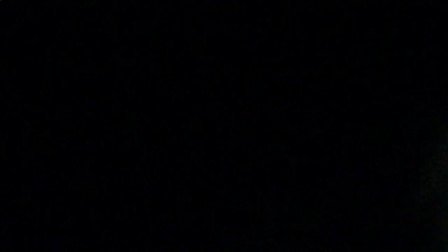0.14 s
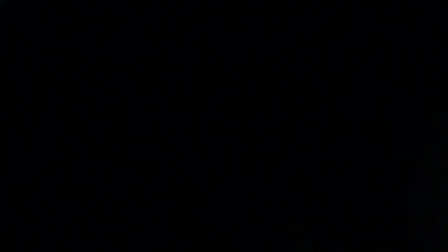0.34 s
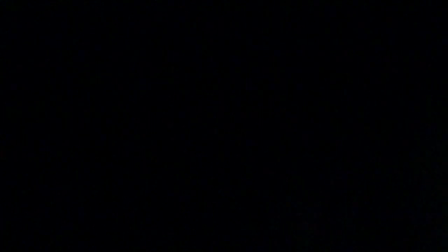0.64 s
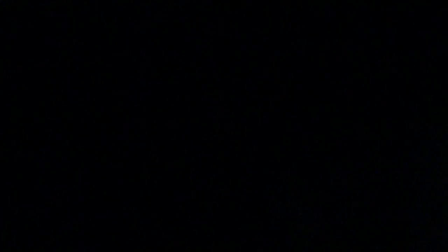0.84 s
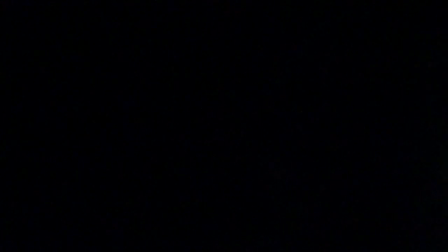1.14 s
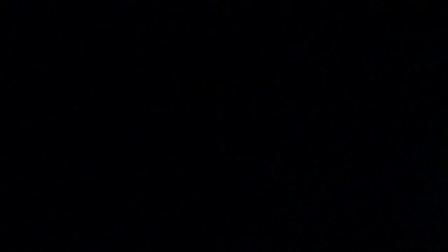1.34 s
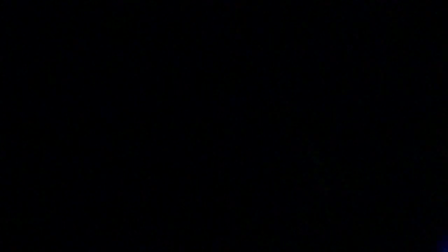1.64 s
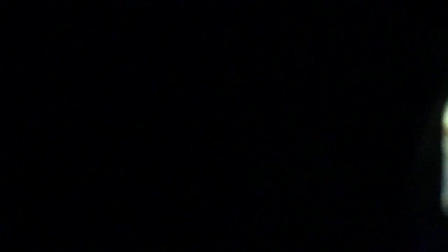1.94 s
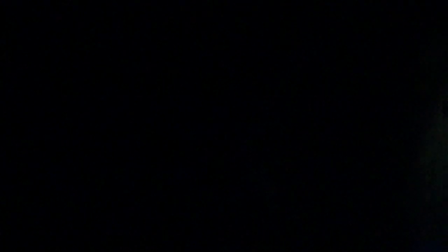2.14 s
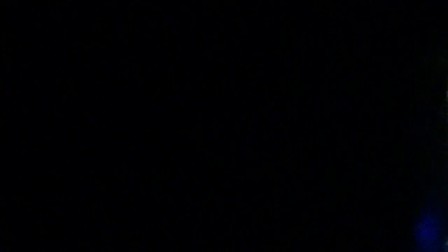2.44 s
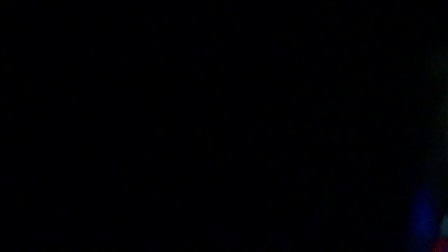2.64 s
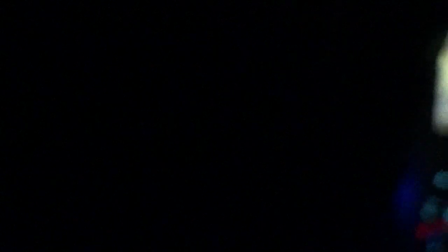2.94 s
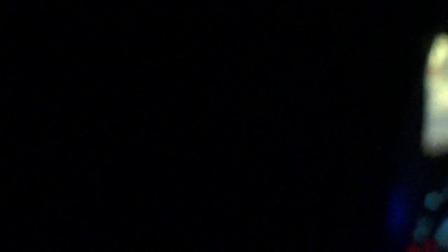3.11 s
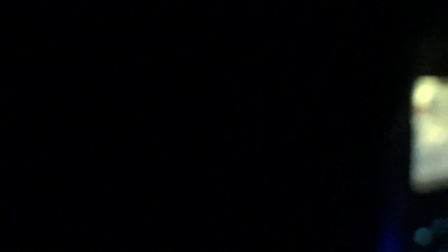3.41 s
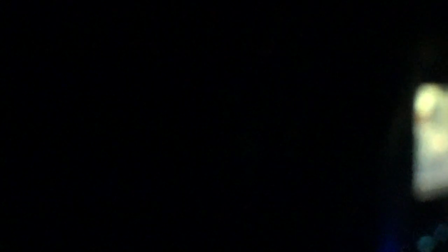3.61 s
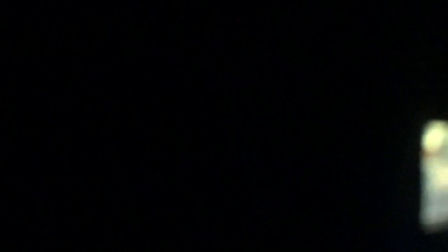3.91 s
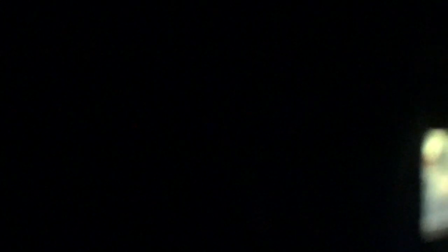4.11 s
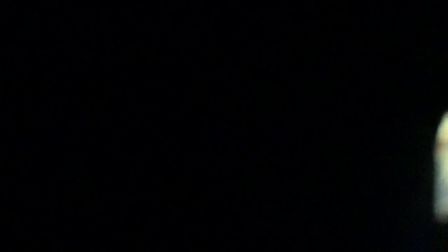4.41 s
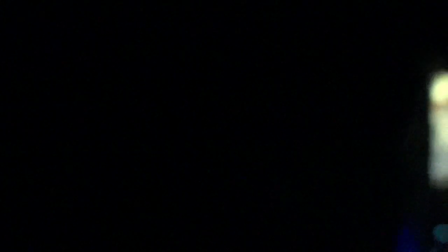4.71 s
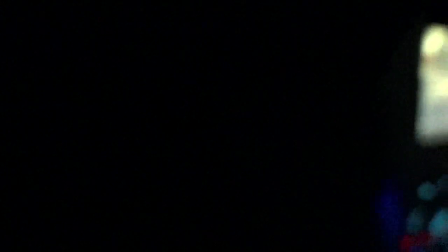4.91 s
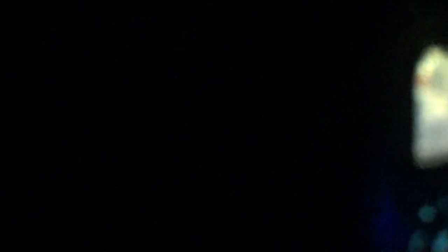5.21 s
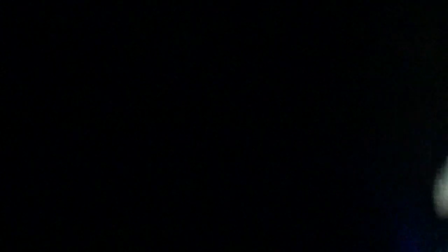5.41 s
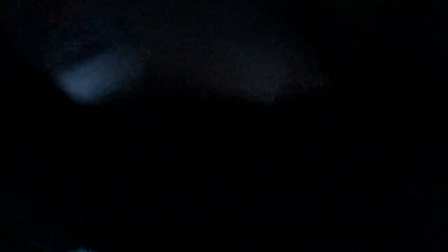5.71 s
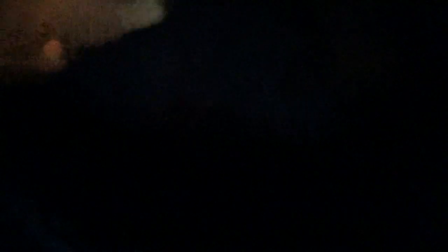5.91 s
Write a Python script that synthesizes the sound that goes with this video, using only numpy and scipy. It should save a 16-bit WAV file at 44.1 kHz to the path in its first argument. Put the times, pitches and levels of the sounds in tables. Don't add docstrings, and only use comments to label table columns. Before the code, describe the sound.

A small electric heater fan blows steadily with a humming whine inside a parked car, while fingers click, knock and rub on plastic close by.

```python
import sys
import numpy as np
from scipy import signal
from scipy.fft import rfft, irfft, next_fast_len
from scipy.io import wavfile
from scipy.ndimage import uniform_filter1d

SR = 44100
rng = np.random.default_rng(int(sys.argv[2]) if len(sys.argv) > 2 else 0)


def makeup_ratio(level_db):
    decades = np.asarray(level_db, float) / 20
    return 10 ** decades


def transcribe(u):
    v = np.clip(np.atleast_2d(u).T, -1, 1)
    q = np.round(v * 32767).astype(np.int16)
    wavfile.write(sys.argv[1], SR, q)


N = 266893
PORTS = np.array([[1], [-1]])


def unit(x):
    return x / np.sqrt(np.mean(x ** 2) + 1e-20)


def along(points, hz):
    f, v = np.transpose(points)
    return np.interp(np.log(hz + 1), np.log(f + 1), v)


def curves(rows, times=None):
    s, *cols = np.transpose(rows)
    times = np.arange(N) / SR if times is None else times
    return [np.interp(times, s, c) for c in cols]


def wobble(rate):
    count = int(N * rate / SR) + 2
    return np.interp(np.arange(N) * rate / SR, np.arange(count), rng.standard_normal(count))


def filtered(x, response):
    m = next_fast_len(N + 8192)
    return irfft(rfft(x, m) * response(np.fft.rfftfreq(m, 1 / SR)), m)[..., :N]


def panned(x, db):
    return x * np.array([makeup_ratio(db / 2) + 0 * x[0], makeup_ratio(-db / 2) + 0 * x[0]])


# f/Hz, coherence/1
COHERENCE = [(60, 1), (130, 0.97), (270, 1), (560, 0.93), (1190, 0.73), (1700, 0.97), (2510, 0.71),
             (5290, 0.61), (11200, 0.9)]


def patches(shape, bands, frames):
    field = uniform_filter1d(rng.standard_normal(shape), size=bands, axis=0)
    return unit(uniform_filter1d(field, size=frames, axis=1))


def rush(spectrum, patchy_db, drift_db):
    z = signal.stft(rng.standard_normal((2, N)), nperseg=512)[2]
    gain_db = patchy_db * patches(z.shape[1:], 5, 12) + drift_db * patches(z.shape[1:], 3, 110)
    pair = signal.istft(z * makeup_ratio(gain_db), nperseg=512)[1][:, :N]

    def mid_side(f):
        turn = np.arccos(np.clip(along(COHERENCE, f) - 0.04, -1, 1)) / 2
        return makeup_ratio(along(spectrum, f)) * [np.cos(turn), np.sin(turn)]

    mid, side = filtered(pair, mid_side)
    return unit(np.array([mid + side, mid - side]))


# t/s, nearness/dB, sway (-1..1), tilt (-1..1), left-right level of the grille/dB
CAMERA = [(0, -0.2, -0.56, -.9, -1), (.45, 0.04, -0.56, -0.62, -2), (.8, .5, -0.25, -0.57, 3),
          (1.2, 0.3, -0.063, .1, 7.5), (1.45, 0.15, .05, 0.41, 6), (1.75, 0, -0.019, .9, 7),
          (2.2, 1, -0.23, -0.86, 8), (2.5, -1, 0.65, -0.064, 7), (2.75, -1.5, 1, -.7, 4),
          (3.05, -1.4, .95, -.4, 5), (3.4, -0.5, 0.17, .25, 10), (3.9, .5, -0.38, 0.88, 6),
          (4.35, 0.86, -0.34, 1, 4), (4.75, -.3, -0.28, 0.21, 10), (5.0, -1, -0.042, 0.61, 7),
          (5.3, -0.1, -0.27, 0.58, 5), (5.7, 0, -0.057, 1, 1), (6.05, -0.2, 0.51, 0.78, -1)]
# t/s, facing (0..1)
JET = [(5.15, 0.1), (5.45, 0.42), (5.55, 0.76), (5.64, 1), (5.75, 1.02), (5.88, 0.88), (6.05, .5)]


def answer(near_db, sway_db, jet_db, times=None):
    near, sway = curves(CAMERA, times)[:2]
    return near_db * near + sway_db * sway + jet_db * curves(JET, times)[0]


# t/s, half length/s, deep lift/dB, drone lift/dB
PASSES = [
    (.08, .15, -5, -7),
    (.4, 0.11, 5, 6),
    (2.32, 0.17, .5, 11.5),
    (3.8, .3, 3, 1.5),
    (4.4, 0.17, -10, -2),
    (5.1, 0.35, 1.5, 6.5),
    (5.6, .35, 9, 1),
]
# start t/s, end t/s, first f/Hz, last f/Hz, level/dB rms
ENGINES = [
    (-1, 7, 97, 97, -59.5),
    (4.5, 4.7, 115, 120, -55),
    (4, 7, 41, 44, -63),
]


def traffic():
    t = np.arange(N) / SR
    deep_db, drone_db = sum(np.outer(lifts, np.exp(-((t - s) / half) ** 2)) for s, half, *lifts in PASSES)
    deep = rush([(15, -10), (30, -1), (45, -2), (65, -4), (100, -9), (200, -60)], patchy_db=1.5, drift_db=0)
    drone_spectrum = [(50, -60), (90, -4.5), (125, -2.5), (215, 0), (300, -39), (500, -60)]
    drone = rush(drone_spectrum, patchy_db=3.0, drift_db=2.0)
    rise_db_per_s, fall_db_per_s = 120, 34
    notes = 0
    for start, end, first_hz, last_hz, top_db in ENGINES:
        hz = np.interp(t, [start, end], [first_hz, last_hz])
        db = top_db - rise_db_per_s * np.maximum(start - t, 0) - fall_db_per_s * np.maximum(t - end, 0)
        unsteady_db = 1.8 * np.array([wobble(6.5), wobble(9)])
        notes = notes + np.sqrt(2) * makeup_ratio(db + unsteady_db) * np.sin(2 * np.pi * np.cumsum(hz) / SR)
    return makeup_ratio(deep_db - 64.5) * deep + makeup_ratio(drone_db - 53.5) * drone + notes


# peak t/s, rise/s, fall/s, peak level/dB
STROKES = [
    (.04, 0.017, 0.018, -15.5),
    (.29, .02, .06, -21),
    (2.304, 0.074, 0.046, -15.5),
    (2.374, .06, 0.11, -16.5),
]


def rustle():
    t = np.arange(N) / SR
    level = sum(makeup_ratio(db) * np.interp(t, [s - rise, s, s + fall], [0, 1, 0]) for s, rise, fall, db in STROKES)
    grain = makeup_ratio(4.5 * wobble(500))
    scrape = rush([(300, -30), (900, -3), (3000, 0), (9500, -4), (11200, -12)], patchy_db=2.5, drift_db=0)
    return makeup_ratio(-11) * level * panned(unit(grain * scrape), -1.8)


# t/s, peak level/dB, first ring f/Hz, second ring f/Hz, thud level/dB
KNOCKS = [ (.21, -17, 723, 830, -30), (.254, -22, 468, 330, -14), (.278, -17, 478, 800, -12),
          (.287, -22, 497, 900, -14), (.282, -16, 1030, 430, -30), (.298, -25, 400, 636, -13),
          (.315, -17, 597, 302, -8), (.322, -18, 530, 480, -14), (.34, -27, 500, 600, -7),
          (.385, -21, 832, 450, -22), (.49, -23, 1030, 943, -30), (1.536, -26.5, 394, 300, -1),
          (2.17, -21, 617, 520, -33), (2.286, -16.5, 558, 924, -8), (2.309, -21, 710, 823, 1.5),
          (2.371, -12.5, 622, 503, -16), (2.3804, -7.5, 480, 525, -20), (2.394, -16.5, 562, 349, -1.5),
          (2.507, -7.5, 473, 920, -32), (2.514, -17, 342, 616, -28), (2.528, -20, 464, 600, -30),
          (2.545, -15.5, 420, 860, -24), (2.919, -15.5, 450, 310, -23), (3.0768, -4.5, 503, 460, -10),
          (3.0882, -12, 436, 400, -23), (3.569, -22, 242, 320, -14), (5.069, -14, 220, 452, -11),
          (5.082, -19, 328, 558, -6), ]


def knocks():
    out, t = np.zeros(N + SR), np.arange(SR // 5) / SR
    scuff_spectrum = [(80, -40), (250, -2.0), (600, 0), (1100, -9.5), (2000, -25)]
    scuff = unit(filtered(rng.standard_normal(N), lambda f: makeup_ratio(along(scuff_spectrum, f))))
    for s, db, hz, second_hz, thud_db in KNOCKS:
        start = round(s * SR)
        t60 = 0.042 - 0.0035 * db
        panel = np.sin(2 * np.pi * hz * t) + 0.59 * np.sin(2 * np.pi * second_hz * t)
        panel = panel + 0.31 * scuff[start:][:len(t)]
        thud = makeup_ratio(thud_db) * (0.74 * np.sin(2 * np.pi * 110 * t) + np.sin(2 * np.pi * 170 * t))
        envelope = makeup_ratio(db - 4.0 - 60 * t / t60) * (1 - np.exp(-t / 0.0023))
        out[start:][:len(t)] += envelope * (panel + thud)

    def at_ports(f):
        return (1j * f / (70 + 1j * f)) ** 2 * np.exp(0.2j * PORTS)

    return filtered(out[:N], at_ports) * makeup_ratio(-0.4 * PORTS)


# t/s, peak level/dB, t60/s
TICKS = [
    (2.6658, -14, .009),
    (2.6755, -10.5, .007),
    (2.689, -25, .008),
]
# f/Hz, level/dB
TICK_COLOUR = [(600, -30), (1300, -2), (4500, 0), (8000, -1), (11100, -8), (11250, 2), (11700, 4),
               (12000, -60)]


def ticks():
    out, t = np.zeros((2, N)), np.arange(SR // 20) / SR
    for s, db, t60 in TICKS:
        shared, own = rng.standard_normal((2, len(t)))
        envelope = makeup_ratio(db - 60 * (t / t60) ** 1.43) * (1 - np.exp(-t / 0.00033))
        out[:, round(s * SR):][:, :len(t)] += envelope * (shared + 0.8 * own * PORTS)
    return filtered(panned(out, 2.5), lambda f: makeup_ratio(along(TICK_COLOUR, f)))


# t/s, peak level/dB, f/Hz, t60/s
PINGS = [(.3062, -22, 6500, 0.037), (.3100, -27, 8800, 0.046), (.2878, -20, 3130, .03),
         (.2920, -21, 4160, .02), (.4945, -17, 3830, .04), (.4975, -25, 5000, .07),
         (1.4597, -15, 2900, 0.023), (1.4620, -21, 8070, .03), (1.4650, -22, 4600, .025),
         (1.4700, -22, 2900, .025), (1.5070, -23, 2970, .03), (2.2825, -18.5, 9100, .02),
         (2.2830, -21, 7400, .05), (2.2830, -17, 8300, .012), (2.2985, -18, 2940, .025),
         (2.3000, -21, 6000, .03), (2.3350, -17, 2900, .022), (2.3355, -20, 3900, .015),
         (2.3770, -18, 3300, 0.017), (2.508, -15, 1300, .025), (2.5120, -16, 1700, .025),
         (2.5480, -18, 900, 0.028), (5.0840, -19, 780, .03), (2.2890, -20, 920, .03),
         (2.6660, -14, 1500, 0.012), (5.0060, -21, 2900, .025), (5.2335, -21, 2950, .03),
         (5.2362, -14, 2900, 0.028), (3.0795, -9.5, 1600, .03), (3.1005, -14, 2160, .03),
         (.4935, -17, 2850, .04), (5.2360, -20, 3900, .02)]


def pings():
    out, t = np.zeros(N + SR), np.arange(SR // 10) / SR
    for s, db, hz, t60 in PINGS:
        envelope = makeup_ratio(db - 60 * t / t60) * (1 - np.exp(-t / 0.00066))
        out[round(s * SR):][:len(t)] += envelope * np.sin(2 * np.pi * hz * t)
    return panned(np.array([out[:N], out[:N]]), -2.2)


# t/s, peak level/dB, first ring f/Hz, second ring f/Hz, t60/s
CLICKS = [ (.0322, -22, 5700, 7600, .05), (.039, -11, 6880, 9100, .026), (.278, -18, 2720, 3600, .05),
          (0.288, -16.5, 3130, 4160, .045), (.3062, -14, 6500, 9000, .045), (0.313, -13, 8800, 7200, .04),
          (.3235, -21, 8800, 8000, .025), (.3500, -21, 7600, 7000, .045), (0.491, -17, 4500, 7000, 0.044),
          (0.4943, -15, 3830, 2865, .04), (.4975, -18.5, 5000, 5050, 0.065),
          (.5314, -14.5, 8270, 6000, 0.018), (1.4597, -12, 2900, 4600, .035),
          (1.4617, -15.5, 5060, 8000, 0.034), (1.503, -19.5, 3970, 2970, .055),
          (1.6472, -18.5, 8030, 9000, .025), (2.282, -26, 9160, 7400, .025),
          (2.2975, -14, 2900, 5900, 0.041), (2.3045, -23, 7900, 9300, .03), (2.3120, -20, 3160, 4600, .03),
          (2.3343, -14, 2900, 3800, .022), (2.3715, -14, 2900, 2300, .03), (2.377, -14, 3300, 3900, .03),
          (2.379, -21.5, 5670, 5650, .14), (2.5005, -16, 8200, 5800, .02), (2.5073, -11, 3630, 6000, 0.014),
          (2.5085, -9.5, 4000, 8500, 0.014), (2.512, -20, 7500, 9500, 0.05), (2.5494, -25, 5500, 7300, .04),
          (3.0742, -15, 4240, 8400, 0.042), (3.0785, -14, 1600, 6900, .045),
          (3.1004, -11, 2130, 2900, .026), (3.1012, -13.5, 7000, 8500, 0.028),
          (5.004, -16.5, 6540, 4000, 0.033), (5.143, -20, 7000, 9200, .04), (5.232, -13, 2930, 3900, .03),
          (5.2358, -16, 4500, 3680, 0.028), ]
# f/Hz, level/dB
CLICK_COLOUR = [(700, -42), (1800, 1), (2900, 3), (6000, 1), (9500, -2.5), (11050, -16), (11200, -45)]


def clicks():
    out, t = np.zeros((2, N + SR)), np.arange(next_fast_len(SR // 8)) / SR
    octaves = np.log2(np.fft.rfftfreq(len(t), 1 / SR) / 5000 + 0.02)
    for s, db, hz, second_hz, t60 in CLICKS:
        pitch = np.log2(hz / 5000)
        tilt_db = 4 * pitch - 2 * np.log2(t60 / 0.038)
        colour_db = tilt_db * octaves + 3 * np.exp(-((octaves - pitch) / 0.77) ** 2)
        noise = rfft(rng.standard_normal((2, len(t))))
        shared, own = unit(irfft(noise * makeup_ratio(colour_db), len(t)))
        crackle = (shared + 0.5 * own * PORTS) * makeup_ratio(-60 * (t / t60) ** 1.16)
        energy = 2.8 * np.sum(makeup_ratio(-120 * (t / t60) ** 1.4))
        crackle = crackle * np.sqrt(energy / np.sum(crackle ** 2))
        ring = 0.45 * np.sin(2 * np.pi * hz * t) + 0.42 * np.sin(2 * np.pi * second_hz * t)
        ring = ring * makeup_ratio(-36 * t / t60)
        attack = 1 - np.exp(-t / 0.0011)
        out[:, round(s * SR):][:, :len(t)] += makeup_ratio(db - 5.0) * attack * (crackle + ring)
    return filtered(panned(out[:, :N], -3.5), lambda f: makeup_ratio(along(CLICK_COLOUR, f)))


# f/Hz, width/Hz, lift/dB
GLINT = [(414, 140, -1), (1330, 91, 2.7), (1570, 160, -0.46), (1760, 140, 2), (1900, 140, -.5),
         (2220, 89, -.5), (2570, 170, 0), (3727, 134, 7), (6190, 280, 4.5)]
# level per nearness/(dB/dB), at full sway/dB, facing the jet/dB, slide/Hz
GLINT_MOVES = [(-0.8, -.5, -6.5, 5), (2.1, -1.2, -1.5, -3), (0.6, -1.1, -4, 50), (-0.8, 1.1, 0, 10),
               (0, 0.5, 3, 0), (-1, .5, -2.5, 0), (1.1, -1.5, 4.5, 30), (-0.2, 0, -11, -60),
               (0.8, 0.1, 0, 700)]
# t/s, half length/s, level/dB
SHADED = [
    (0, .4, -2),
    (1.45, .3, -7.5),
    (2.65, 0.43, -6),
    (5.05, .35, -7),
]


def reflected(x):
    hz, t, z = signal.stft(x, SR, nperseg=512)
    sway, tilt = curves(CAMERA, t)[1:3]

    def band(centre_hz, width_hz):
        return np.exp(-((hz[:, None] - centre_hz) / width_hz) ** 2)

    top_db = 7.5 - 4.5 * abs(tilt - 0.09)
    lift_db = top_db * band(9000 + 400 * tilt, 250)
    shade_db = sum(db * np.exp(-((t - s) / half) ** 2) for s, half, db in SHADED)
    lift_db += shade_db * band(3770, 200)
    for (centre, width, db), (*moves, slide) in zip(GLINT, GLINT_MOVES):
        lift_db = lift_db + (db + answer(*moves, t)) * band(centre + slide * sway, width)
    return signal.istft(z * makeup_ratio(lift_db), SR, nperseg=512)[1][:, :N]


# f/Hz, level/dB per Hz
CABIN = [(100, -73), (200, -26.5), (260, -8.5), (383, -5), (555, -8.5), (684, -2), (756, -6.5), (921, -5),
         (1150, -12), (1500, -54), (2530, -120)]
DUCT = [(680, -39), (1150, -9), (1510, 0), (1820, -4), (1870, -11.5), (1970, -3), (2040, -16), (2100, -9),
        (2730, -49), (4620, -120)]
GRILLE = [(1240, -28), (2100, -11), (2180, -2.5), (2530, 1), (2710, -2), (3100, -11.5), (4030, -40),
          (6820, -120)]
HISS = [(1820, -47), (3100, -3.5), (3500, -0.5), (4040, -4.5), (4600, -4.5), (5400, -5.5), (6200, -8.5),
        (7500, -6), (9000, -11), (10000, -20), (10900, -15.5), (11150, -41.5), (11400, -60)]


def air(levels_db, angle):
    cabin_db, duct_db, grille_db, hiss_db = levels_db
    pan_db = curves(CAMERA)[-1]
    throb = 1 + 0.032 * np.sin(angle) + 0.04 * np.sin(2 * angle + 2.7)
    cabin = makeup_ratio(cabin_db) * rush(CABIN, patchy_db=1.48, drift_db=0.2)
    duct = makeup_ratio(duct_db) * panned(rush(DUCT, patchy_db=1.34, drift_db=-0.43), 1.0)
    grille = makeup_ratio(grille_db) * panned(rush(GRILLE, patchy_db=0.7, drift_db=0.6), 0.67 * pan_db)
    hiss = makeup_ratio(hiss_db) * throb * rush(HISS, patchy_db=1.23, drift_db=1.2)
    return cabin + duct + grille + hiss


# shaft multiple, level per nearness/(dB/dB), at full sway/dB, facing the jet/dB
TONE_MOVES = [(5, 0, 1.5, 1), (8, 0.5, -1.5, 12.5), (9, 2, 5, -5), (12, -2, -1, 3), (20, 1, -2.5, 1),
              (25, 1, 0, -4), (29, 1.5, 2, -2), (32, -0.5, 2, -1), (33, 0, 1, 5)]


def tones(orders, angle, fade_db, flicker_db, lean):
    out, knots, at = np.zeros((2, N), np.float32), np.linspace(0, N, num=90), np.arange(N)
    turn = (angle % (2 * np.pi)).astype(np.float32)
    moves = {k: rest for k, *rest in TONE_MOVES}
    for k, db in orders:
        phase = rng.uniform(0, 2 * np.pi) + lean * rng.standard_normal() * PORTS
        slow, quick = rng.standard_normal((2, len(knots)))
        db = db + answer(*moves.get(k, (0, 0, 0)), knots / SR)
        db = db + fade_db * unit(uniform_filter1d(slow, size=6)) + flicker_db * quick
        size = np.interp(at, knots, np.sqrt(2) * makeup_ratio(db)).astype(np.float32)
        out += size * np.sin(np.float32(k) * turn + phase.astype(np.float32))
    return out


# t/s, f/Hz
SHAFT = [(0.0, 77.133), (0.5, 77.143), (1.0, 77.07), (1.5, 77.088), (2.0, 77.143), (2.5, 77.035),
         (3.0, 77.172), (3.5, 77.168), (4.0, 77.12), (4.5, 77.127), (5.0, 77.169), (5.5, 77.076),
         (6.0, 77.277)]
# f/Hz, level/dB rms
BRUSH = [(2700, -51.5), (4000, -54), (5500, -60), (6500, -53), (8000, -72), (9500, -58.5), (11000, -64)]


def brush_pattern(angle, scatter_db):
    k = np.arange(2049)
    sizes = makeup_ratio(along(BRUSH, k * SHAFT[0][1]) + scatter_db * rng.standard_normal(len(k)))
    sizes = sizes * (k > 35) * (k < 143)
    turn = irfft(sizes * np.exp(2j * np.pi * rng.random(len(k)))) * 4096 / np.sqrt(2)
    return np.interp(angle / (2 * np.pi) % 1 * 4096, np.arange(4097), np.append(turn, turn[0]))


# shaft multiple, level/dB rms
ORDERS_LOW = [(1, -57), (3, -54), (5, -43.5), (6, -50), (8, -52), (9, -40.5), (11, -49), (12, -45.5),
              (13, -47), (14, -51), (16, -49), (20, -34), (21, -45), (23, -50), (25, -34.5), (26, -54),
              (29, -40), (32, -45), (33, -46), (34, -52), (35, -52)]
# shaft multiple, level/dB rms
ORDERS_HIGH = [(45, -57), (53, -59), (55, -59), (59, -59), (75, -59), (76, -60), (77, -56), (79, -56),
               (80, -57), (81, -57), (82, -56), (83, -58), (86, -54), (88, -55), (89, -59), (116, -61),
               (118, -58), (123, -61), (124, -63), (140, -65), (142, -66)]


def motor(angle, duct_db, hiss_db):
    hiss_rise_db = hiss_db - np.median(hiss_db)
    facing_db = np.maximum(hiss_rise_db - 2.0, 0)
    hum = tones(ORDERS_LOW, angle, fade_db=1.4, flicker_db=2.2, lean=0.13)
    hum = makeup_ratio(-0.02 + 0.65 * (duct_db - duct_db.mean()) - 0.91 * facing_db) * hum
    blend = 1.5 * wobble(1.21)
    scrape = np.cos(blend) * brush_pattern(angle, scatter_db=3)
    scrape = scrape + np.sin(blend) * brush_pattern(angle, scatter_db=3)
    whine = tones(ORDERS_HIGH, angle, fade_db=0.0, flicker_db=6.0, lean=0.56) + scrape
    return hum + makeup_ratio(-5.0 + 0.82 * hiss_rise_db) * whine


# level/dB, per nearness/(dB/dB), at full sway/dB, facing the jet/dB
LAYERS = [
    (-33.5, 0.7, 2, 2),
    (-27, 0.8, -0.1, 1.9),
    (-33, -0.1, 0.7, 3),
    (-35, 1, 0.26, 6.5),
]


def heater():
    levels_db = [db + answer(*moves) for db, *moves in LAYERS]
    angle = 2 * np.pi * np.cumsum(curves(SHAFT)[0]) / SR
    angle = angle + 0.011 * wobble(30)
    left, right = reflected(motor(angle, levels_db[1], levels_db[3]) + air(levels_db, angle))
    side = (left - right) / 2 * makeup_ratio(answer(0, 0, -1.5))
    return (left + right) / 2 + side * PORTS


def scene():
    return traffic() + rustle() + knocks() + ticks() + pings() + clicks() + heater()


def low_pass(x):
    return signal.sosfilt(signal.butter(12, 11760, fs=SR, output="sos"), x)


def record(dry):
    band_edge = [(11120, 0), (11160, -32), (11750, -34), (11800, -120)]
    limited = filtered(dry, lambda f: makeup_ratio(along(band_edge, f)))
    return low_pass(limited)


dry = scene()
out = record(dry)
transcribe(out)
```